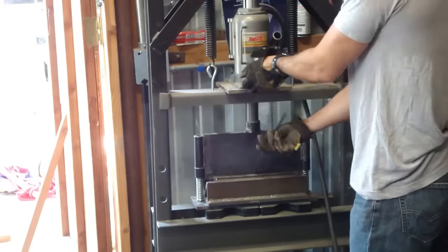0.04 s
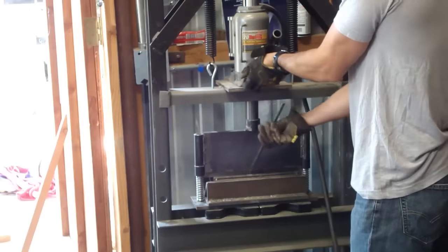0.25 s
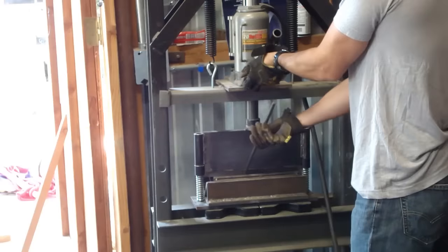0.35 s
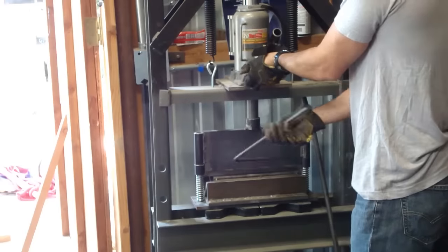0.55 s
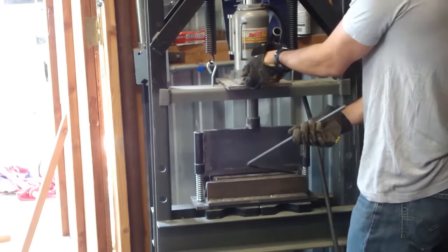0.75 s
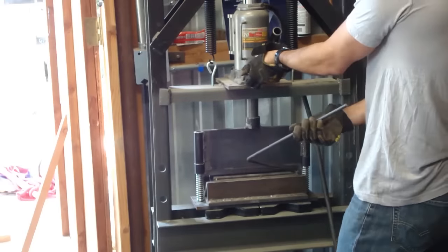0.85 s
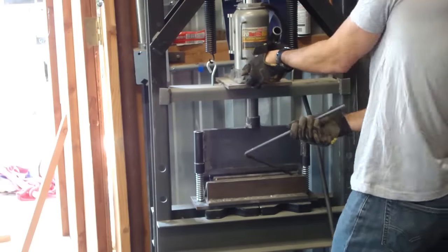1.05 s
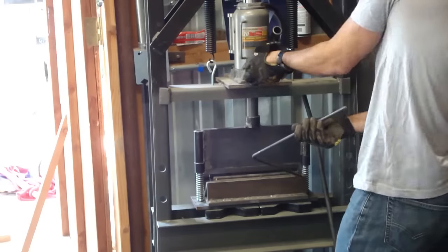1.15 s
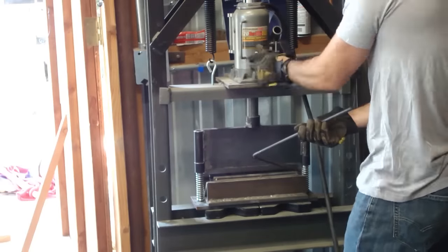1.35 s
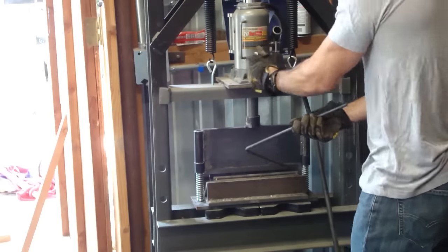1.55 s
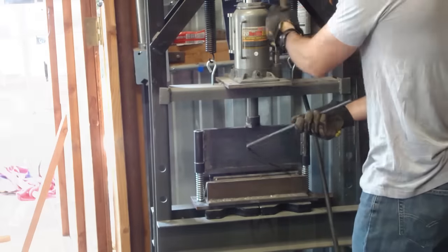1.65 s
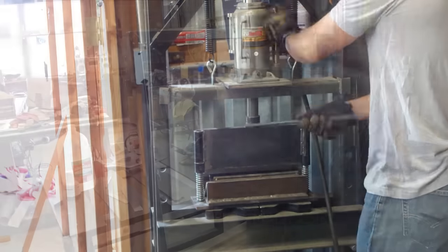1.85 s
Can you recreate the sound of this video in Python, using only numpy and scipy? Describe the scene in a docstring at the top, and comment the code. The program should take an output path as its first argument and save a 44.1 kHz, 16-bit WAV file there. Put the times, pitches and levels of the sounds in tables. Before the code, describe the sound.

Ringing clink of a metal rod on a press frame, later a knock and light jingle.

```python
"""A steel rod knocks about on a hydraulic press frame, clinks hard against it and bounces once.
Each blow is a noise burst plus ringing modes; a glove damps the rod. After a pause a gloved hand
works the jack: a click, a dull knock, a thin jingle of small parts. Cloth rustles as the rod is
lifted. Behind it all: soft workshop air, low rumble and a narrow high hiss."""
import sys
import numpy as np
from scipy import signal
from scipy.fft import rfft, irfft
from scipy.io import wavfile

SR = 44100
rng = np.random.default_rng(int(sys.argv[2]) if len(sys.argv) > 2 else 0)


def unload_audio(sound):
    """Save the sound as a 16-bit wav file, at the path given as the first command line argument."""
    columns = np.transpose(np.atleast_2d(sound))
    # keep every value between -1 and 1, then stretch to whole-number steps
    steps = np.round(np.clip(columns, -1, 1) * 32767)
    wavfile.write(sys.argv[1], SR, steps.astype(np.int16))


N = 83790
TIME_S, FREQ_HZ = np.arange(N) / SR, np.fft.rfftfreq(N, 1 / SR)
TILT_PIVOT_HZ, BAND_LIMIT_HZ = 2000, 10750


def rod():
    """Steel on steel: a bright clash, then a clear ring until the glove damps it."""
    # Clink and bounces: t/s, ring level/dB, clash level/dB, tilt/(dB/oct)
    clinks = [(.381, -54, -58.5, -5), (0.406, -27, -27.5, 0.5), (.419, -27, -29.5, -2),
              (0.455, -42, -41.5, 3.5), (0.484, -26.5, -45, -2.5)]
    # Clash spectrum: f/Hz, level/dB
    spectrum = [(40, -64), (120, -47), (330, -24), (480, -1), (900, -2.5), (1450, 5.5), (1850, -2),
                (2900, 2), (4200, 3.5), (5900, -9), (7400, 1), (9400, -11.5), (10700, -13.5)]
    # Clash decay: f/Hz, t60/s
    decay = [(400, 0.17), (1400, 0.37), (4000, 0.12), (10000, 0.12)]
    # Rod modes: f/Hz
    modes_hz = [1418, 1459, 1636, 2137, 2864, 3462, 4055, 4764, 4904, 5113, 5143, 5543, 6191, 6944, 7277,
                7835, 9191, 10307]
    # Same modes: level/dB, t60/s, rise/s
    envelopes = [(-12, 0.17, 0.015), (-20, 0.49, 0.0041), (-11, 0.32, 0.076), (1.5, 0.16, 0.013),
                 (-2.5, 0.21, 0.0069), (-4, 0.17, 0.024), (-14.5, .12, 0.012), (-11, 0.24, 0.025),
                 (-14, 0.15, 0.017), (-4, 0.18, 0.029), (-6.5, 0.14, 0.032), (-17, 0.27, 0.011),
                 (-11.5, 0.16, .02), (-32, 0.35, 0.0096), (-16.5, 0.21, 0.003), (-24, 0.2, 0.0045),
                 (-23.5, 0.22, 0.01), (-22, 0.21, 0.013)]
    modes = [(hz, *row) for hz, row in zip(modes_hz, envelopes)]
    clash = burst(clinks, spectrum, decay, rise_s=0.012)
    tone = ring(clinks, modes, scatter=0.5, waver_hz=35.6)
    grip_s, grip_db_per_s = 0.47, 118.5
    grip = amp(-grip_db_per_s * np.maximum(TIME_S - grip_s, 0))
    return grip * (echoed(clash) + tone)


def frame():
    """Soft bumps draw a hollow clatter from the press frame."""
    # Bumps: t/s, ring level/dB, thud level/dB, tilt/(dB/oct)
    bumps = [(0.077, -57.5, -58, -1.5), (0.108, -66, -54, -4), (0.186, -51.5, -50.5, 2),
             (0.205, -37, -41, 2.5), (.234, -41.5, -41, 1.5), (0.275, -46.5, -52.5, -4.5),
             (0.289, -43.5, -41, 0.5), (0.323, -59.5, -57, 3), (.365, -66, -67, -2.5)]
    # Thud spectrum: f/Hz, level/dB
    spectrum = [(40, -59), (120, -27), (300, -4.5), (620, 12), (900, 8.5), (1450, 10), (1820, -17),
                (2150, 1), (3000, -26.5), (4100, -39), (4900, -8.5), (7500, -23), (10500, -33)]
    # Thud decay: f/Hz, t60/s
    decay = [(400, 0.31), (2000, 0.31), (8000, 0.071)]
    # Frame modes: f/Hz, level/dB, t60/s, rise/s
    modes = [(632, -1, 0.19, 0.015), (722, -4, 0.26, 0.004), (1190, -10, 0.12, 0.0077),
             (1232, -35, 0.45, 0.0068), (1330, -7.5, 0.43, 0.0045), (1427, -0.5, 0.15, 0.0022),
             (1505, -8.5, 0.12, 0.0085), (1664, -15, 0.31, 0.023), (2128, -2.5, 0.054, 0.0094),
             (2162, -19.5, 0.076, 0.0032), (2810, -22, 0.16, 0.018), (3530, -16, 0.094, 0.018),
             (4740, -22.5, 0.16, 0.014), (4847, -21, 0.25, 0.009)]
    thud = burst(bumps, spectrum, decay, rise_s=0.0048)
    return echoed(thud) + ring(bumps, modes, scatter=0.65)


def pings():
    """Each glancing touch of steel rings one mode."""
    # Touches: t/s, level/dB, f/Hz, rise/s, t60/s
    touches = [(.08, -61.5, 2174, .008, .3), (0.176, -53, 6900, 0.0061, 0.17),
               (.237, -44.5, 3410, 0.0068, 0.07), (.240, -44.5, 2556, 0.0084, .13),
               (0.242, -54, 5790, 0.0043, 0.17), (0.291, -31.5, 2139, 0.0042, 0.14),
               (0.322, -37.5, 2134, 0.0031, 0.1), (0.379, -54, 5020, 0.0086, 0.2),
               (1.637, -39, 4110, 0.004, 0.088), (1.79, -42, 1473, .004, 0.085),
               (1.837, -54.5, 4950, 0.0031, 0.27)]
    return sum(ring([(start_s, db, 0, 0)], [(hz, 0, t60_s, rise_s)], scatter=0.9)
               for start_s, db, hz, rise_s, t60_s in touches)


def jack():
    """Dull knocks with a crowded, quickly damped ring."""
    # Knocks: t/s, ring level/dB, thud level/dB, tilt/(dB/oct)
    knocks = [(1.41, -74, -63, -5.5), (1.728, -40.5, -46.5, -6), (1.734, -38.5, -34.5, 0)]
    # Thud spectrum: f/Hz, level/dB
    spectrum = [(40, -64.5), (150, -30.5), (500, -29), (850, -7), (1300, 2.5), (2000, -1), (2700, -8.5),
                (3500, 2.5), (4300, -5.5), (5300, -10), (6050, -4), (7200, -23.5), (8000, -34),
                (10500, -40)]
    # Thud decay: f/Hz, t60/s
    decay = [(500, 0.35), (1300, 0.21), (3500, .15), (7000, 0.13)]
    # Jack modes: f/Hz, level/dB, t60/s, rise/s
    modes = [(1077, -16, .2, 0.0046), (1258, -7.5, 0.2, 0.0058), (1325, -8.5, .2, 0.0073),
             (1461, -9, 0.25, 0.0056), (1517, -9, 0.21, 0.0025), (1644, -14, 0.11, 0.0034),
             (1980, -6.5, 0.11, 0.0023), (2210, -8, 0.12, 0.0026), (3310, -10, 0.17, 0.0053),
             (4980, -10.5, 0.073, 0.0034), (6000, -16.5, 0.34, .005)]
    thud = burst(knocks, spectrum, decay, rise_s=0.0019)
    return echoed(thud) + ring(knocks, modes, scatter=0.75)


def small_parts():
    """Light clicks, scuffs and jingles, each one broad resonance with the bass filtered out."""
    # Touches: t/s, relative level/dB, f/Hz, width/Hz, rise/s, t60/s
    ticks = [(.049, -60, 5150, 450, .008, .25), (.766, -56, 1300, 1700, .022, .2),
             (.772, -55, 5600, 1900, .02, .17), (.892, -64, 4800, 3500, .003, .15),
             (1.125, -59, 1200, 1200, .015, .17), (1.135, -53, 1190, 160, .005, .17),
             (1.157, -62, 5650, 400, .008, .15), (1.625, -49, 1800, 2300, .018, .17),
             (1.632, -53, 4920, 400, .008, .14), (1.633, -41.5, 3740, 330, .01, .08),
             (1.759, -54, 7380, 250, .008, .19), (1.805, -55, 4950, 180, .008, .25),
             (1.806, -49, 7250, 550, .026, .16), (1.814, -54, 4100, 330, .008, .16)]
    low_cut_hz, gain_db = 550, -1
    highpass = FREQ_HZ ** 2 / (FREQ_HZ ** 2 + low_cut_hz ** 2)
    out = np.zeros(N)
    for start_s, db, hz, width_hz, rise_s, t60_s in ticks:
        resonance = (1 + 2 * ((FREQ_HZ - hz) / width_hz) ** 2) ** -1.5
        out += amp(db) * swell(start_s, rise_s, t60_s) * noise(highpass * resonance)
    return amp(gain_db) * echoed(out)


def rustle():
    """Gloves and sleeve rub as the rod is lifted."""
    # Cloth spectrum: f/Hz, level/dB
    spectrum = [(300, -21), (1500, 7.5), (5500, 2), (7000, 6), (9500, 6.5), (10700, -2.5)]
    # Cloth envelope: t/s, level/dB
    levels = [(0, -79), (.07, -68), (.15, -67), (.24, -55.5), (.33, -69), (.4, -55), (.55, -89)]
    return drifting(spectrum, levels)


def workshop():
    """Soft room air, low rumble and a narrow high hiss, each drifting in level."""
    # Spectra: f/Hz, level/dB
    air = [(25, -39.5), (60, -30), (100, -11.5), (150, -8), (220, -0.5), (600, 5), (1100, 5), (1600, -3),
           (3000, -5.5), (4600, -12), (5800, -20), (6500, -23.5), (7600, -23), (9500, -33.5), (10700, -38)]
    rumble = [(30, -36), (60, -25), (100, -7.5), (150, 4), (215, 4), (300, 5), (500, -3.5), (1200, -44)]
    hiss = [(5200, -46), (5950, -17), (6400, -40.5), (7400, -43), (8100, -24), (8500, -12.5), (8790, 3),
            (8950, -11), (9150, -31.5), (10000, -53)]
    # Envelopes: t/s, level/dB
    air_levels = [(0, -64), (.4, -59.5), (.65, -64), (.98, -62), (1.25, -62), (1.55, -63), (1.9, -57.5)]
    rumble_levels = [(0, -80.5), (.23, -66.5), (.4, -88), (.7, -76), (.95, -69), (1.17, -70.5), (1.45, -77),
                     (1.75, -84), (1.9, -89)]
    hiss_levels = [(0, -53.5), (.35, -55), (.6, -59.5), (.9, -55), (1.15, -57.5), (1.35, -61), (1.9, -69.5)]
    room = drifting(air, air_levels) + drifting(rumble, rumble_levels)
    return echoed(room) + drifting(hiss, hiss_levels)


def ring(hits, modes, scatter, waver_hz=35.2):
    """Every hit feeds every mode; reflections (scatter = reflected/direct) make each tone waver."""
    lowpass = 1 / (1 + (FREQ_HZ / waver_hz) ** 2)
    out = np.zeros(N)
    for hz, db, t60_s, rise_s in modes:
        octaves = np.log2(hz / TILT_PIVOT_HZ)
        power = sum((amp(hit_db + tilt * octaves) * swell(start_s, rise_s, t60_s)) ** 2
                    for start_s, hit_db, _, tilt in hits)
        reflected = (noise(lowpass) + 1j * noise(lowpass)) / np.sqrt(2)
        waver = (1 + scatter * reflected) / np.hypot(1, scatter)
        carrier = np.exp(2j * np.pi * (hz * TIME_S + rng.random()))
        out += amp(db) * np.sqrt(2 * power) * (waver * carrier).real
    return out


def burst(hits, spectrum, decay, rise_s):
    """Dense short-lived modes and echoes of each hit, as noise bands with their own decay."""
    bands_hz = np.geomspace(200, 10000, 8)
    shares = [at_hz(list(zip(bands_hz, row)), FREQ_HZ) for row in np.eye(len(bands_hz))]
    octaves = np.log2(np.maximum(FREQ_HZ, bands_hz[0]) / TILT_PIVOT_HZ)
    out = np.zeros(N)
    for start_s, _, db, tilt in hits:
        colour = amp(at_hz(spectrum, FREQ_HZ) + tilt * octaves) * (FREQ_HZ < BAND_LIMIT_HZ)
        bins = rfft(noise(colour))
        for hz, share in zip(bands_hz, shares):
            out += amp(db) * irfft(bins * share, N) * swell(start_s, rise_s, at_hz(decay, hz))
    return out


def swell(start_s, rise_s, t60_s):
    """A blow builds up through the steel and nearby walls, then dies away."""
    age_s = TIME_S - start_s
    return np.clip(age_s / rise_s, 0, 1) * amp(-60 * np.maximum(age_s - rise_s, 0) / t60_s)


def echoed(x):
    """Adds first echoes from the press plates and a nearby wall."""
    # Echoes: delay/s, level/dB
    echoes = [(.0057, -22), (.0094, -14)]
    response = 1 + sum(amp(db) * np.exp(-2j * np.pi * FREQ_HZ * delay_s) for delay_s, db in echoes)
    return signal.oaconvolve(x, irfft(response, N)[:2048])[:N]


def drifting(spectrum, levels):
    """Coloured noise on a slow level curve."""
    envelope = amp(np.interp(TIME_S, *np.transpose(levels)))
    return envelope * noise(amp(at_hz(spectrum, FREQ_HZ)))


def noise(gain):
    """Unit-RMS noise of the given spectral shape."""
    x = irfft(gain * np.exp(2j * np.pi * rng.random(len(FREQ_HZ))), N)
    return x / (x.std() + 1e-20)


def at_hz(points, hz):
    """Table lookup on a log-frequency axis."""
    points_hz, values = np.transpose(points)
    return np.interp(np.log(hz + 1), np.log(points_hz + 1), values)


def amp(db):
    """dB to gain."""
    return 10 ** (np.asarray(db) / 20)


def scene():
    """Mono sum of all sources."""
    return (rod() + frame() + pings() + jack() + small_parts() + workshop() + rustle())[None]


def record(dry):
    """Low-pass at the band limit."""
    lowpass = signal.firwin(301, BAND_LIMIT_HZ, window=("kaiser", 8), fs=SR)
    return signal.oaconvolve(dry, lowpass[None], "same")


dry = scene()
out = record(dry)
unload_audio(out)
```